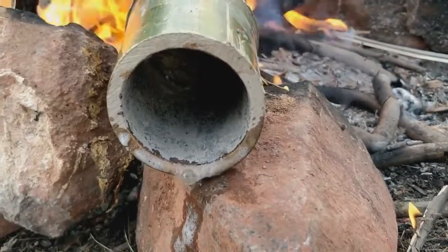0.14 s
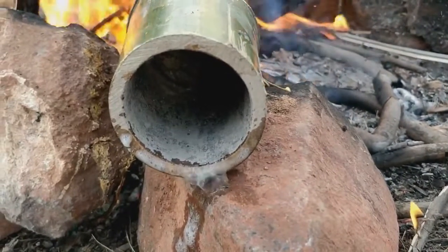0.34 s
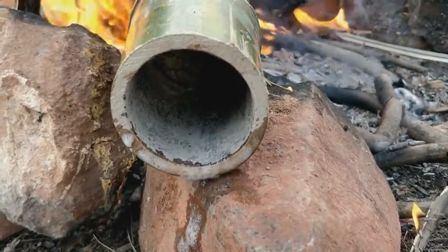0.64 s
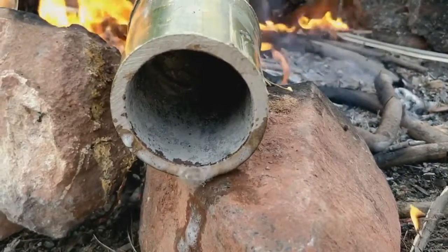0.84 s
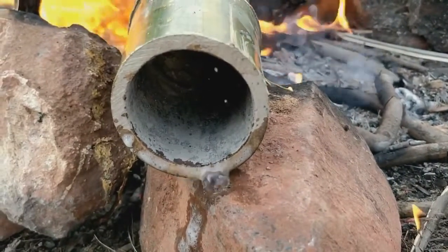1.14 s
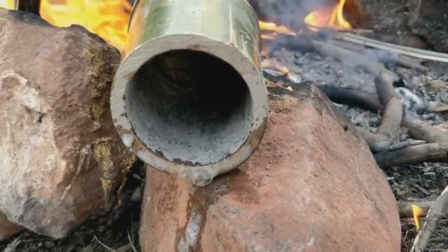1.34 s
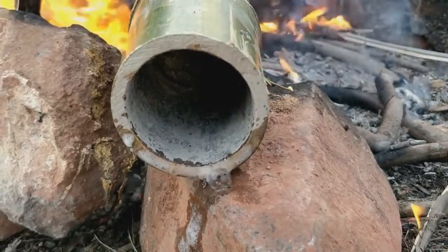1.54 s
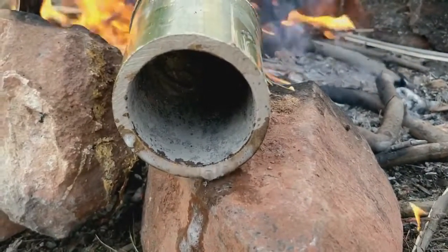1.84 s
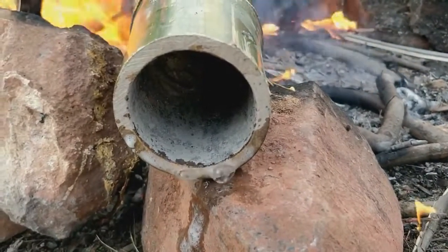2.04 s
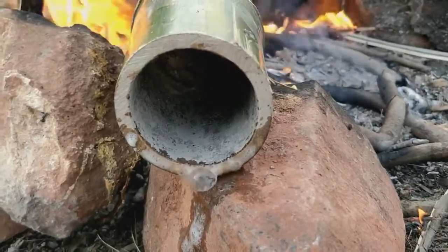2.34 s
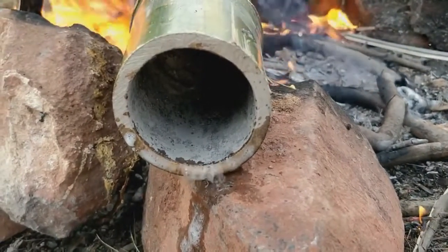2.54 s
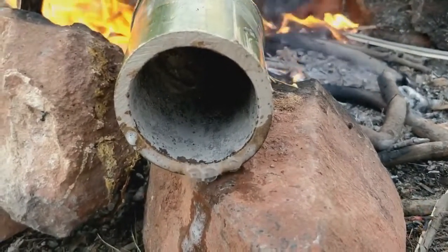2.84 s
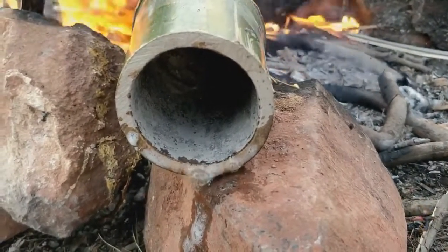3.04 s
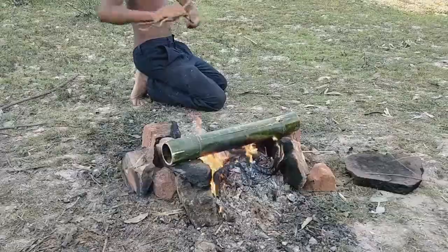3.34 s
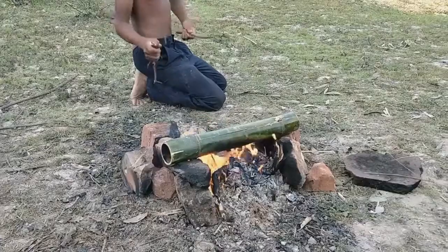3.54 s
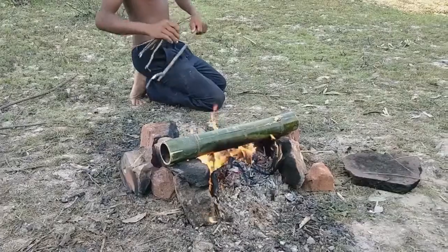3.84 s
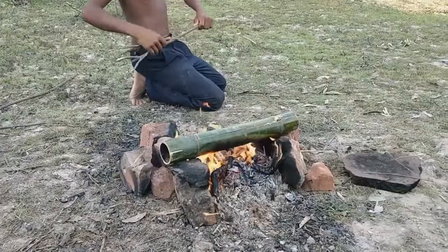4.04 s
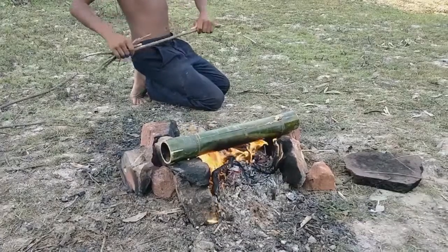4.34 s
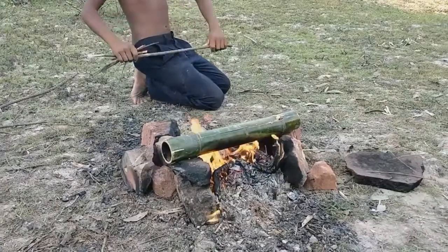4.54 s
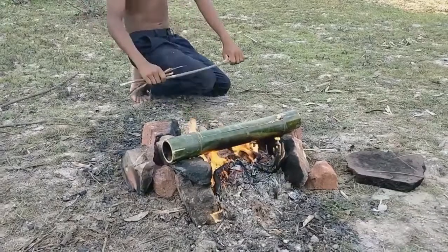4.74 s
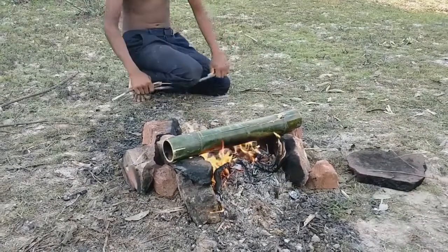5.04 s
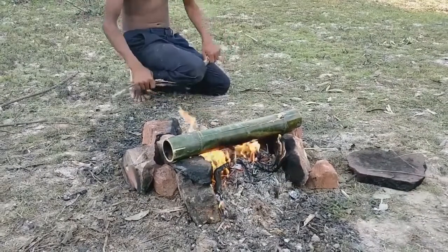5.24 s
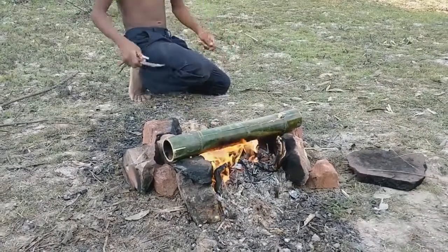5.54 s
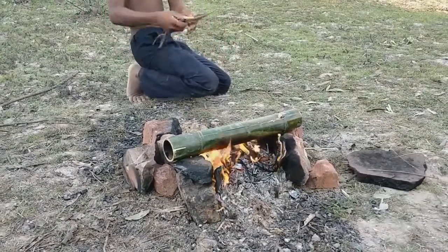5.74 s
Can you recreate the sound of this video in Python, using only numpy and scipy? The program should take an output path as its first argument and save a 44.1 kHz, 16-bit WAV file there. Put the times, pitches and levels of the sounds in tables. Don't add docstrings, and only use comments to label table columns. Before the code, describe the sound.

Boiling sap hisses steadily as steam while flames flap and puff deeply underneath, all close and stereo. Midway the sound drops suddenly to a distant, thin hiss. A dry stick cracks at once, wind buffets the microphone and eases, a second bigger crack with splintery rustle follows two seconds later, and gusts return at the end. Open air, no room echo.

```python
import sys
import numpy as np
from scipy import signal
from scipy.fft import rfft, irfft, next_fast_len
from scipy.io import wavfile

SR = 44100
rng = np.random.default_rng(int(sys.argv[2]) if len(sys.argv) > 2 else 0)


def makeup_ratio(level_db):
    decades = np.asarray(level_db, float) / 20
    return 10 ** decades


def wav_record(signal):
    frames = np.transpose(np.atleast_2d(signal))
    bounded = np.clip(frames, -1, 1)
    quanta = np.round(bounded * 32767).astype(np.int16)
    wavfile.write(sys.argv[1], SR, quanta)


N = 259735
CHANGE_S = 3.29
SIDES = np.array([[0.5], [-0.5]])


def rms_one(x):
    return x / np.sqrt(np.mean(x ** 2) + 1e-20)


def in_time(rows):
    s, *columns = np.transpose(rows)
    return [np.interp(np.arange(N) / SR, s, c) for c in columns]


def drift(rate):
    r = np.exp(-40 * np.pi * rate / SR)
    slow = signal.lfilter([1], [1, -2 * r, r * r], rng.standard_normal(N // 20 + 3002))[3000:]
    return np.interp(np.arange(N) / 20, np.arange(len(slow)), rms_one(slow))


def swells_db(rows, half_s):
    t = np.arange(0, N, 20) / SR
    bumps = sum(db * np.exp(-((t - s) / half_s) ** 2) for s, db in rows)
    return np.interp(np.arange(N) / SR, t, bumps)


def band(x, low_hz, high_hz):
    sos = signal.butter(2, [low_hz, min(high_hz, 0.45 * SR)], "band", fs=SR, output="sos")
    return signal.sosfilt(sos, x)


def resonance(x, hz, width_hz):
    r = np.exp(-np.pi * width_hz / SR)
    poles = [1, -2 * r * np.cos(2 * np.pi * hz / SR), r * r]
    return signal.lfilter([(1 - r * r) / 2, 0, (r * r - 1) / 2], poles, x)


def patchy_noise(size, patchy_db, silent_share=0.11):
    cells = signal.stft(rng.standard_normal((3, size)), nperseg=1024)[2]
    bins, frames = cells.shape[1:]
    patches = rng.standard_normal((bins // 3 + 1, frames)).repeat(3, axis=0)[:bins]
    going = rng.random((bins // 4 + 1, frames // 4 + 1))
    going = going.repeat(4, axis=0).repeat(4, axis=1)[:bins, :frames]
    going = (going > silent_share) | (np.arange(bins)[:, None] < 50)
    return signal.istft(cells * makeup_ratio(patchy_db * patches) * going, nperseg=1024)[1][:, :size]


def port_noise(colour, ports, edge_db=-12, notches=(), patchy_db=2.0):
    size = next_fast_len(N)
    hz = np.maximum(np.fft.rfftfreq(size, 1 / SR), 1)
    at, level_db = np.transpose(colour)
    level_db = np.interp(np.log(hz), np.log(at), level_db)
    level_db = level_db + edge_db * np.maximum(np.log2(at[0] / hz), 0)
    for mid_hz, width_hz, db in notches:
        level_db = level_db + db * np.exp(-(2 * (hz - mid_hz) / width_hz) ** 2)
    level_db[hz > 15480] = -120
    at, *columns = np.transpose(ports)
    lift_db, alike, lag = (np.interp(hz, at, c) for c in columns)
    alike = np.clip(alike, 0, 1)
    shared, left, right = rfft(patchy_noise(size, patchy_db))
    left = makeup_ratio(lift_db) * (np.sqrt(alike) * shared * np.exp(-1j * lag) + np.sqrt(1 - alike) * left)
    right = np.sqrt(alike) * shared + np.sqrt(1 - alike) * right
    return rms_one(irfft(makeup_ratio(level_db) * np.array([left, right]), size)[:, :N])


# pitch_hz [Hz], level_db [dB per Hz]
STEAM_COLOUR = [(900, -49), (1500, -15.5), (2700, -5), (3400, -8.5), (4600, 0.5), (5800, 0), (7000, -6),
                (7700, -6), (8350, -10.5), (9500, -7), (11200, -12.5), (12100, -11.5), (13500, -10.5),
                (15300, -12)]
# pitch_hz [Hz], left_lift_db [dB], likeness [0-1], left_lag [rad]
NEAR_PORTS = [(900, 13, 0.8, 0.69), (1960, -4, 0.57, 2.23), (2800, -4, 0.6, 1), (2940, 0, .9, 0),
              (3070, 0, .9, 0), (3170, -.5, .95, np.pi), (3580, -1, .92, np.pi), (3670, -7, 0.2, 0.96),
              (4030, 3, 1, 2.05), (4170, 2, .8, 1.9), (4235, 0, 1, np.pi), (5540, 0, 1, np.pi),
              (5900, 0.5, 0.25, 3.8), (6640, -5.5, 0.37, 5.6), (6750, 0, 0.5, 5.6),
              (6880, 0, .9, 2 * np.pi), (7030, 0, .9, 2 * np.pi), (7100, 0, .94, np.pi),
              (7320, 0, .94, np.pi), (7380, -1.5, 0.2, 4.3), (8000, 2.5, 0.67, 4.5), (8200, 0, .9, 3.14),
              (8300, 0, .9, 3.14), (8380, 0, .93, 2 * np.pi), (8900, 0, .94, 2 * np.pi),
              (9000, 7, 0.3, 3.9), (9500, 3, 1, 7.4), (11280, 14.5, 0.1, 8.3), (11800, 3.5, 0.13, 6.6),
              (15500, -1.5, .1, 3.2)]
# pitch_hz [Hz], width_hz [Hz], level_db [dB]
HISS_NOTCHES = [(5030, 130, -18), (3350, 500, -5), (14200, 400, -5), (7050, 450, -6), (8330, 200, -8),
                (13700, 500, -4)]


def steam_jet():
    t = np.arange(N) / SR
    level_db = -41.5 + 0.38 * t
    level_db = level_db + 0.96 * drift(17) + 0.21 * drift(4.1)
    hiss = port_noise(STEAM_COLOUR, NEAR_PORTS, notches=HISS_NOTCHES, patchy_db=2.0)
    return (t < CHANGE_S) * makeup_ratio(level_db) * hiss


# start_s [s], level_db [dB], length_s [s], pitch_hz [Hz]
NARROW_BANDS = [(0.244, -57, 0.04, 4910), (0.762, -64, 0.055, 5370), (0.86, -59.5, 0.035, 4970),
                (1.195, -63, 0.05, 5320), (1.553, -55, 0.03, 4870), (1.56, -57, 0.14, 5430),
                (1.855, -62, 0.29, 5380), (2.028, -53, 0.073, 5450), (2.159, -53, 0.038, 4920),
                (2.367, -61.5, 0.044, 5500), (2.504, -61.5, 0.21, 5290), (2.861, -58, 0.11, 4830),
                (3.007, -54.5, 0.028, 4870), (3.157, -57, 0.12, 5280), (0.192, -62, 0.11, 3420),
                (.42, -64, 0.072, 3500), (0.543, -63.5, 0.18, 3410), (.84, -62, .12, 3410),
                (1.108, -62.5, 0.31, 3420), (1.7, -63, 0.22, 3480), (1.97, -61.5, 0.26, 3480),
                (2.203, -63.5, 0.11, 3530), (2.406, -65.5, 0.11, 3450), (2.592, -61, .07, 3400),
                (3.11, -63, 0.11, 3530), (2.9, -60, .06, 4300), (0.03, -63, .06, 3550), (.3, -63, .08, 3600),
                (.97, -63, .06, 3600), (1.06, -63, .06, 3250), (1.3, -59, .05, 5450), (1.7, -58, .06, 5400),
                (2.26, -63, .06, 3600), (2.36, -63, .06, 3250), (2.53, -63, .07, 3250), (2.66, -63, .07, 3600),
                (2.93, -63, .1, 3600)]


def narrow_bands():
    white, hisses = rng.standard_normal(N), np.zeros(N)
    for s, db, length, hz in NARROW_BANDS:
        i, j = round(s * SR), round((s + length) * SR)
        narrow = band(white[i - 999:j], hz - 170, hz + 170)
        narrow = band(narrow, hz - 170, hz + 170)[999:]
        hisses[i:j] += makeup_ratio(db) * rms_one(narrow) * signal.windows.tukey(j - i, 0.4)
    return hisses


# start_s [s], peak_db [dB], length_s [s]
LICKS = [(0.016, -24, 0.027), (0.121, -24, 0.021), (0.246, -25, 0.042), (0.303, -21, 0.01),
         (0.546, -25.5, 0.032), (0.583, -24.5, 0.017), (0.667, -30, 0.04), (0.816, -24.5, 0.027),
         (0.893, -20.5, 0.019), (0.935, -23.5, 0.022), (1.064, -27.5, 0.012), (1.102, -30.5, 0.092),
         (1.217, -31.5, 0.03), (1.256, -30, 0.062), (1.435, -27.5, 0.019), (1.493, -20.5, 0.015),
         (1.543, -20.5, 0.011), (1.611, -26, 0.065), (1.655, -26.5, 0.03), (1.776, -18, 0.0086),
         (1.835, -29, 0.032), (1.923, -28, 0.032), (2.014, -26.5, 0.026), (2.107, -31, 0.11),
         (2.359, -27, 0.037), (2.463, -29.5, 0.16), (2.622, -28, 0.023), (2.671, -23.5, 0.051),
         (2.876, -23.5, 0.014), (3.189, -31.5, 0.039), (0.067, -33.5, 0.017), (0.183, -33, .015),
         (.266, -27, .015), (0.745, -29.5, 0.014), (0.87, -34, 0.0097), (1.009, -29, 0.014),
         (1.157, -30, 0.011), (1.234, -28, .012), (1.277, -23.5, .012), (1.359, -32, 0.015),
         (1.395, -29, .012), (1.582, -31, 0.011), (1.694, -28, 0.019), (1.982, -31, 0.01),
         (2.286, -32.5, 0.014), (2.322, -31, 0.019), (2.436, -34.5, 0.014), (2.53, -28.5, .015),
         (2.63, -27, .015), (2.75, -30, 0.013), (2.774, -29.5, .012), (2.799, -30.5, .012),
         (2.904, -30.5, 0.014), (2.965, -37, 0.013), (3.002, -34, 0.012), (3.064, -29, 0.023),
         (3.141, -33, 0.019)]


def lick_strength():
    t, power = np.arange(N) / SR, np.zeros(N)
    for s, peak_db, length in LICKS:
        i, j = round(s * SR), round((s + 0.25) * SR)
        age = (t[i:j] - s) / max(length, 0.005)
        power[i:j] += (makeup_ratio(peak_db - 18.5) * np.minimum(age / 0.042, 1) * np.exp(-age ** 2)) ** 2
    return np.sqrt(power)


# time_s [s], swell_db [dB]
PUFFS = [
    (0.6, 10),
    (0.77, 15),
    (0.99, 18),
    (1.2, 14),
    (1.97, -7),
    (2.65, 7.5),
    (2.86, 11.5),
    (3.1, 9.5),
]


def hot_air_rumble(vigour_db):
    level_db = -65.5 + 0.45 * vigour_db + 3 * np.arange(N) / SR
    level_db = level_db + swells_db(PUFFS, half_s=0.049) + 2.0 * drift(4.6)
    rumble = rms_one(band(rng.standard_normal((2, N)), 13, 61))
    return makeup_ratio(level_db + 2.4 * SIDES) * rumble


# time_s [s], level_db [dB]
FLAME = [(0, -44), (.29, -43.5), (.36, -51.5), (.5, -46), (.57, -46), (1.27, -40.5), (1.66, -43.5),
         (1.74, -48), (1.9, -43), (2.17, -42), (2.25, -45), (2.65, -41), (2.9, -45), (3.1, -41.5),
         (3.24, -44.5)]
# pitch_hz [Hz], level_db [dB per Hz]
FLAME_COLOUR = [(35, -20), (60, -8), (237, 0.5), (378, 2), (519, -4.5), (741, -8), (949, -12), (1150, -18),
                (1600, -21), (2080, -14.5), (3520, -120)]
# time_s [s], swell_db [dB]
BILLOWS = [(.1, 2), (.35, 5.5), (.55, 4.5), (.75, -0.5), (.92, 4), (1.15, 0.5), (1.38, -1.5), (1.55, -2.5),
           (1.72, 5.5), (1.9, 0.5), (2.05, 2), (2.2, -2.5), (2.35, 0.5), (2.52, 2), (2.76, -2), (2.95, 0.5),
           (3.12, 2.5)]


def flame():
    vigour_db = in_time(FLAME)[0] - np.mean(FLAME, axis=0)[1]
    ports = [(60, 0.53, 1.0, 0.3), (151, 3.4, 0.91, 0.0), (300, 2.6, 1.0, 0.14),
             (770, 0.67, 0.96, 0.46), (1510, 0.59, 0.97, 0.94)]
    roar = port_noise(FLAME_COLOUR, ports)
    flutter = drift(21)
    middle_db = -47 + 0.96 * vigour_db - 2.0 + 1.7 * flutter + 1.4 * drift(35)
    middle = makeup_ratio(middle_db) * rms_one(band(roar, 180, 535))
    billow_db = -51.5 + 0.66 * vigour_db + swells_db(BILLOWS, half_s=0.086) + 2.0 * flutter
    billows = makeup_ratio(billow_db) * 1.3 * rms_one(band(roar, 40, 250))
    upper_db = -52.5 + 1.5 * vigour_db + 1.5 * flutter + 1.9 * drift(27)
    upper = makeup_ratio(upper_db) * rms_one(band(roar, 443, 1340))
    licks = lick_strength() * makeup_ratio(1.9 * drift(65)) * rms_one(band(roar, 318, 1410))
    everything = middle + billows + upper + licks + hot_air_rumble(vigour_db)
    return (np.arange(N) / SR < CHANGE_S) * everything


# pitch_hz [Hz], level_db [dB]
TWIG_COLOUR = [(350, -1), (750, 0.5), (1600, 1), (3500, 8.5), (7000, 1.5), (12000, 0)]


def twig_colour(blow, treble_db):
    return sum(makeup_ratio(db + treble_db * (hz > 5000)) * band(blow, hz / 1.22, hz * 1.53) for hz, db in TWIG_COLOUR)


# start_s [s], peak_db [dB], ring_hz [Hz], left_right_db [dB], length_s [s]
SNAPS = [(3.344, -45.5, 9500, 5, 0.0018), (3.352, -34, 4200, -1, 0.0024), (3.3628, -26, 11000, 1, 0.0008),
         (3.3644, -22, 4270, 1, 0.0013), (3.367, -45, 3900, 0, 0.0018), (3.4008, -9.5, 4250, 5, 0.0004),
         (3.4030, -11, 3500, -1.5, 0.0006), (3.4018, -15, 4500, 0, .0012), (3.3636, -31, 8000, 0, .0015),
         (3.404, -21, 4030, 2, 0.0018), (3.4141, -28, 10100, 7, .0011), (3.4201, -18.5, 10600, -2, 0.001),
         (3.4205, -40, 3500, 3, 0.001), (5.108, -43, 10600, 7, 0.00075), (5.112, -38.5, 7000, 5, 0.0013),
         (5.2849, -9.5, 8000, 10, 0.00052), (5.2865, -6, 6900, -1.5, 0.0006),
         (5.2876, -16.5, 4200, -5, 0.0014), (5.304, -18.5, 11000, 1, .003),
         (5.3063, -17, 2380, -1.5, 0.0039), (5.3182, -23, 9000, 2, 0.002), (5.321, -23, 11000, 1, 0.0012),
         (5.2863, -13.5, 8000, 1, 0.00078), (5.293, -22, 7500, 4, 0.0016), (5.327, -32, 11000, 2, 0.0037),
         (5.291, -27, 10500, 4, 0.0027)]
# start_s [s], peak_db [dB], ring_hz [Hz], length_s [s]
KNOCKS = [(3.4013, -22, 1850, 0.0044), (3.4014, -34, 850, 0.0059), (3.398, -30.5, 210, 0.0029),
          (3.418, -30, 380, 0.0025), (4.0482, -40, 2030, 0.006), (4.0484, -38, 3940, 0.004),
          (5.284, -27.5, 740, 0.0033), (5.283, -33, 340, 0.002), (5.285, -28, 1790, 0.0028),
          (5.333, -36, 504, 0.0017), (5.35, -42, 1760, 0.0078), (5.3198, -20, 3330, 0.0023),
          (3.425, -37.5, 3600, .004), (5.857, -45, 3200, .002), (5.856, -46, 1240, 0.016),
          (5.86, -45, 1800, 0.0099)]


def fibre_breaks():
    out, size = np.zeros((2, N + SR)), SR // 8
    age = np.arange(size) / SR
    breaks = [(*row, 5, 0.39) for row in SNAPS]
    breaks += [(s, db, hz, -3, length, -25.5, 0.29) for s, db, hz, length in KNOCKS]
    for s, peak_db, hz, pan_db, length, treble_db, width in breaks:
        fibres = rng.standard_normal((2, size)) * makeup_ratio(5 * rng.exponential(1, size).clip(0, 3))
        fibres[1] = 1.26 * fibres[0] + 0.39 * fibres[1]
        rise = np.minimum(age / (0.000076 + 0.046 * length), 1)
        blow = fibres * rise * np.exp(-(age / max(length, 0.0004)) ** 2) + 1e-18
        crack = makeup_ratio(0.5 * treble_db) * twig_colour(blow, treble_db)
        width_hz = width * hz + 130
        crack += makeup_ratio(8.0) * resonance(resonance(blow, hz, width_hz), hz, width_hz)
        crack = crack / np.abs(crack).max(axis=1, keepdims=True)
        i = round(s * SR)
        out[:, i:i + size] += crack * makeup_ratio(peak_db + SIDES * pan_db)
    return out


# start_s [s], level_db [dB], left_right_db [dB], decay_s [s]
SPLINTERS = [(3.365, -51, -5, 0.0059), (3.391, -51, 4, 0.028), (3.404, -31, 2, 0.0071),
             (3.415, -33, -4, 0.0091), (5.099, -46, -5, 0.024), (5.288, -34.5, 11, 0.011),
             (5.307, -32.5, 2, 0.017), (5.319, -43, 6, 0.023), (5.328, -47, -3, 0.036),
             (5.345, -49, 0, .04), (3.423, -45, 0, .012)]


def splinters():
    out, size = np.zeros((2, N + SR)), SR // 8
    age = np.arange(size) / SR
    for s, db, pan_db, decay in SPLINTERS:
        grains = rng.standard_normal((2, size)) * makeup_ratio(1.6 * rng.exponential(1, size).clip(0, 3))
        rustle = rms_one(twig_colour(grains, treble_db=5.5))
        rustle = rustle * np.minimum(age / 0.0035, 1) * np.exp(-age / decay)
        i = round(s * SR)
        out[:, i:i + size] += makeup_ratio(db + SIDES * pan_db) * rustle
    return out


def twigs():
    out = fibre_breaks() + splinters()
    out[0] += makeup_ratio(16) * resonance(out[0], hz=11000, width_hz=1200)
    out = signal.sosfilt(signal.butter(2, 12500, fs=SR, output="sos"), out)
    return signal.sosfilt(signal.cheby2(10, 40, 16400, fs=SR, output="sos"), out[:, :N])


# time_s [s], level_db [dB]
WIND = [
    (3.34, -43.5),
    (3.47, -53.5),
    (3.6, -44.5),
    (3.95, -48.5),
    (4.4, -56),
    (4.6, -63),
    (5.3, -59.5),
    (5.6, -52),
    (5.89, -50),
]
# pitch_hz [Hz], level_db [dB per Hz]
WIND_COLOUR = [(12, -28), (20, 2), (54, 1.5), (140, -1.5), (273, -21.5), (330, -21), (433, -40.5),
               (900, -51), (1170, -50), (1980, -120)]
# time_s [s], swell_db [dB]
THUMPS = [(3.42, 7), (3.63, -2), (3.93, 7.5), (4.04, 4), (4.08, 6), (4.2, 5), (4.36, 7), (4.99, 16),
          (5.06, 7.5), (5.64, 7), (5.78, 4), (5.87, 3)]


def wind():
    level_db = in_time(WIND)[0] + swells_db(THUMPS, half_s=0.019)
    gust_db = level_db - np.mean(WIND, axis=0)[1]
    veer_s = np.arange(N) / SR - WIND[0][0]
    pan_db = 13.5 - 0.53 * gust_db - 6 * veer_s
    lumps = makeup_ratio(3.2 * np.array([drift(34), drift(34)]))
    ports = [(61.4, 0.0076, 0.13, 0.0045), (140, 0, 0.5, 0), (322, 0, 1.0, 0.02)]
    gusts = rms_one(lumps * port_noise(WIND_COLOUR, ports))
    return (np.arange(N) > CHANGE_S * SR) * makeup_ratio(level_db + 2.0 + SIDES * pan_db) * gusts


# time_s [s], peak_db [dB], left_right_db [dB], width_s [s]
PUSHES = [
    (4.0173, -37, 2, 0.0034),
    (4.044, -41, 4, 0.0019),
    (4.078, -37.5, 5, 0.0042),
    (5.784, -35.5, -12, .0022),
    (5.819, -42, -9, .0025),
    (5.8726, -30.5, -12, 0.0017),
    (5.882, -37, -8, 0.0019),
    (5.888, -32, -12, 0.0017),
]


def pushes():
    out = np.zeros((2, N + SR))
    for s, db, pan_db, width in PUSHES:
        i = round((s - 0.02) * SR)
        u = (np.arange(i, i + SR // 25) / SR - s) / width
        out[:, i:i + SR // 25] += makeup_ratio(db + SIDES * pan_db) * (1 - u ** 2) * np.exp(-u ** 2 / 2)
    return out[:, :N]


# time_s [s], level_db [dB]
FAR = [(3.33, -57), (4.03, -55.5), (4.22, -56.5), (5.32, -55.5), (5.49, -57), (5.73, -55.5), (5.89, -53.5)]
# pitch_hz [Hz], level_db [dB per Hz]
FAR_COLOUR = [(900, -6.5), (1500, -6), (2700, 3.5), (3400, -3), (4600, 0.6), (5800, 1), (7000, -1),
              (7700, -1.2), (8350, 0.5), (9500, -5.5), (11200, -9.5), (12100, -6.5), (13500, -2),
              (15300, -6)]
# pitch_hz [Hz], left_lift_db [dB], likeness [0-1], left_lag [rad]
FAR_PORTS = [(850, 2.5, 0.84, -0.5), (2010, 3.5, 0.06, -7.5), (2830, -3, 0.05, 2.5),
             (3140, 2.5, 0.94, -5.5), (3900, 2.5, 0.46, 5), (4500, -2.5, 0.02, -2.5), (8940, 2, 0.12, 2),
             (10000, 11.5, 0.2, -9.5), (11720, 16, 0.8, 2), (13450, 4, 0.6, -0.5), (14700, 2, 0.1, -9)]


def far_hiss():
    level_db = in_time(FAR)[0] + 4.5 + 0.5 * drift(22)
    notches = [(4920, 240, -8.0), (8700, 790, -7), (15500, 980, 7.5)]
    hiss = port_noise(FAR_COLOUR, FAR_PORTS, edge_db=3.5, notches=notches, patchy_db=2.5)
    return (np.arange(N) > CHANGE_S * SR) * makeup_ratio(level_db) * hiss


def scene():
    close = steam_jet() + narrow_bands() + flame()
    far = twigs() + wind() + pushes() + far_hiss()
    return close + far


def top_cut(x):
    return signal.sosfilt(signal.butter(12, 16810, fs=SR, output="sos"), x)


def record(dry):
    t = np.arange(N) / SR
    after = np.maximum(t - 3.242, 0)
    close_db = 7 - 13001 * after
    remnant_db = -57 - 1900 * after
    close_gain = makeup_ratio(np.maximum(close_db, remnant_db))
    far_gain = 1 - np.exp(-np.maximum(t - 3.321, 0) / 0.023)
    gain = close_gain + makeup_ratio(-69) + far_gain
    mix = 0.73 * np.tanh(gain * dry / 0.77)
    return top_cut(mix)


dry = scene()
out = record(dry)
wav_record(out)
```